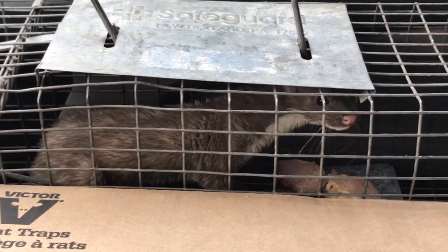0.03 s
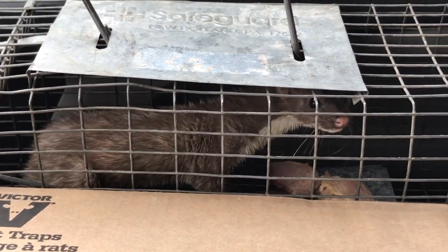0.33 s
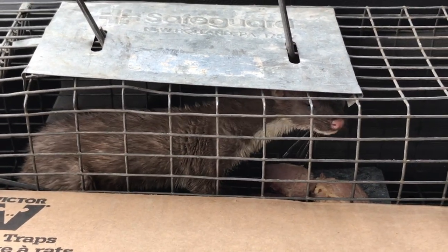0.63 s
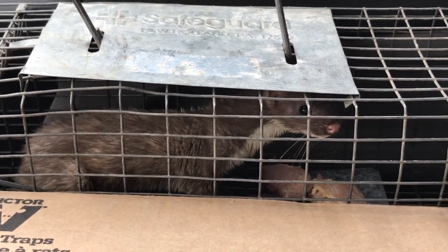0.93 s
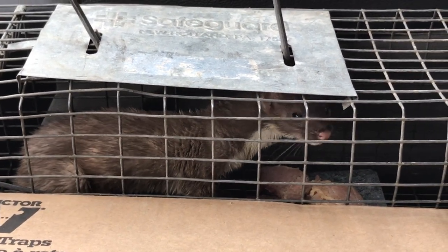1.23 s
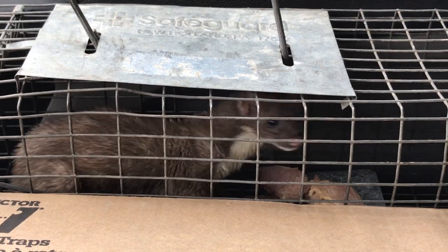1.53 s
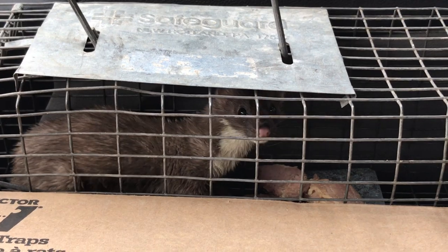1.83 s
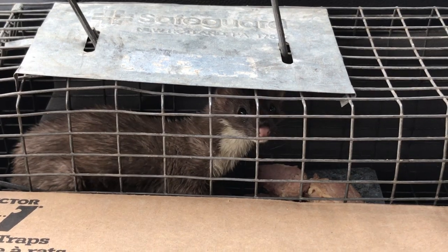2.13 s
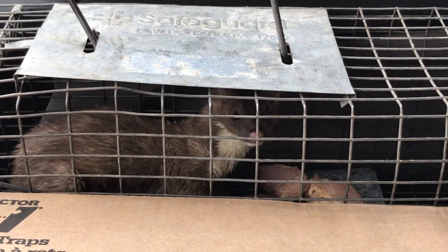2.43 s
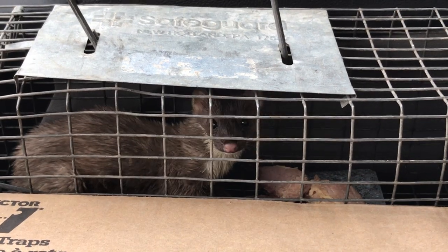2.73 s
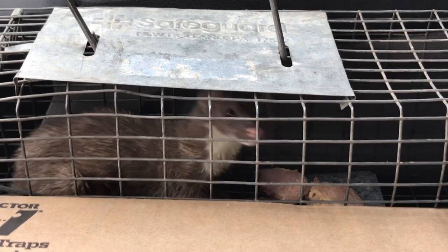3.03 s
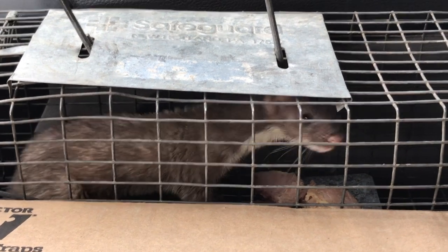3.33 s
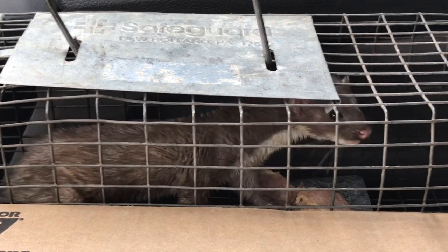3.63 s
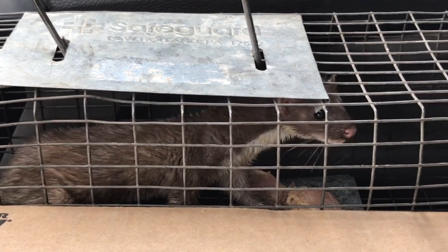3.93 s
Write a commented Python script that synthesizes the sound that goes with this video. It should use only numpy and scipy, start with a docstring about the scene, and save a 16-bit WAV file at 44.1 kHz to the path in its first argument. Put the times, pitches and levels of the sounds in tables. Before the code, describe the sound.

Two short, harsh hisses come from a trapped weasel nearby, after a faint nasal wheeze. Each swells and cuts off abruptly, the second with a soft paw bump, over steady outdoor rumble and the hum of far machinery.

```python
"""Outdoors, one microphone close to a weasel in a wire cage trap; a low rumble and the hum of far
machinery run throughout. First comes a faint, thin wheeze through the nose. At 1.3 s the animal hisses:
the breath starts thin through nearly shut jaws, broadens as they open and stops abruptly, while the
sheet-metal lid and the cage floor reflect it as the head moves. It shifts its feet at 3 s, then hisses
again with its head stretched forward, a paw bumping softly just after the start."""
import sys
import numpy as np
from scipy import signal
from scipy.fft import rfft, irfft
from scipy.io import wavfile
from scipy.ndimage import map_coordinates

SR = 44100
rng = np.random.default_rng(int(sys.argv[2]) if len(sys.argv) > 2 else 0)


def inscribe(sig):
    """Save sig as 16-bit PCM at rate SR to the path in sys.argv[1].

    A 1-D sig is mono; a 2-D sig holds one channel per row.
    Samples are clipped to [-1, 1] before scaling.
    """
    pcm = np.round(np.clip(np.atleast_2d(sig).T, -1, 1) * 32767)
    wavfile.write(sys.argv[1], SR, pcm.astype(np.int16))


N = 176400
TIME = np.arange(N) / SR


def from_db(db):
    """Decibels to gain."""
    return 10 ** (np.asarray(db) / 20)


def in_time(rows):
    """The columns of a curve at every sample."""
    times, *columns = np.transpose(rows)
    return [np.interp(TIME, times, column) for column in columns]


def gate(rows):
    """One between the first and last point of a curve, else zero."""
    return (TIME > rows[0][0]) & (TIME < rows[-1][0])


def white(size):
    """White noise of 0 dB per Hz."""
    return rng.standard_normal(size) * np.sqrt(SR / 2)


def coloured(spectrum):
    """Steady noise with a spectrum given as (frequency [Hz], level [dB per Hz])."""
    hz, db = np.transpose(spectrum)
    bin_hz = np.maximum(np.arange(N // 2 + 1) * SR / N, 1)
    bin_db = np.interp(np.log(bin_hz), np.log(hz), db)
    return irfft(rfft(white(N)) * from_db(bin_db), N)


def resonant_noise(hz, width_hz):
    """Turbulence passed twice through one resonance, whose centre may move; 0 dB per Hz at the peak."""
    pole = np.exp(-np.pi * width_hz / SR)
    run_in = SR // 4
    noises = [white(N + run_in), white(N + run_in)]
    swell = signal.lfilter([(1 - pole) ** 2], [1, -2 * pole, pole * pole], noises)[:, run_in:]
    phase = 2 * np.pi * np.cumsum(hz * np.ones(N)) / SR
    return np.sqrt(2) * (swell[0] * np.cos(phase) + swell[1] * np.sin(phase))


def drift(rate_hz):
    """A smooth random wander with a spread of one."""
    pole = np.exp(-2 * np.pi * rate_hz / SR)
    wander = signal.lfilter([1], [1, -2 * pole, pole * pole], rng.standard_normal(N + SR))[SR:]
    return wander / wander.std()


def background():
    """The open air around the trap: low rumble, faint air noise and the wavering hum of far machinery."""
    # spectra of the rumble and of the air above it: (frequency [Hz], level [dB per Hz])
    rumble = [(15, -99), (26, -86.5), (35, -75.5), (49, -63.5), (59, -71.5), (70, -66.5), (90, -69),
              (125, -76), (175, -83.5), (230, -85.5), (300, -91), (370, -96), (550, -99), (650, -101),
              (950, -103)]
    air = [(1150, -106), (1800, -112), (2200, -111), (2800, -115.5), (4450, -116), (4950, -121),
           (5800, -117.5), (7600, -122.5), (9500, -120), (10400, -125.5), (11100, -121), (12200, -120.5),
           (15700, -123.5)]
    # machinery hum lines: (frequency [Hz], width [Hz], level [dB per Hz])
    hum = [(68.95, 12, -70), (198.5, 8.6, -81.5), (319.2, 12.3, -84.5), (745, 71, -95), (1032, 8, -96.5)]
    return coloured(rumble + air) + sum(from_db(db) * resonant_noise(hz, width) for hz, width, db in hum)


def wheeze():
    """A thin stream of air excites the resonances of the weasel's nose."""
    # strength of the breath: (time [s], level [dB])
    breath = [(.22, -29), (.38, 0.5), (.52, 2), (.70, -2.5), (.78, -3), (.92, 2), (1.02, -6), (1.14, -25)]
    # nose resonances at 0 dB of breath: (frequency [Hz], width [Hz], level [dB per Hz])
    nose = [(3740, 330, -117.5), (4500, 400, -116.5), (5960, 450, -114.5), (6450, 870, -116.5),
            (8630, 2600, -126.5)]
    level_db, = in_time(breath)
    air = sum(from_db(db) * resonant_noise(hz, width) for hz, width, db in nose)
    return air * from_db(level_db) * gate(breath)


def hiss(gesture, mouth):
    """Breath excites the mouth; opening jaws shift and reweight its resonances and lift the teeth's rush.

    gesture: (time [s], effort [dB], jaw opening [0-1])
    mouth, at 0 dB effort: (frequency shut [Hz], frequency wide [Hz], width [Hz],
                            level shut [dB per Hz], level wide [dB per Hz])"""
    # air rushing past the teeth, jaws wide, at 0 dB effort: (frequency [Hz], level [dB per Hz])
    teeth = [(700, -124), (1200, -107), (3000, -106), (4900, -108), (5600, -104.5), (8000, -106),
             (10400, -109), (11200, -107), (13000, -108.5), (16000, -110)]
    teeth_shut_db, flutter_db = -7.5, 1.0
    effort_db, jaw = in_time(gesture)
    air = coloured(teeth) * from_db(teeth_shut_db * (1 - jaw))
    for shut_hz, wide_hz, width_hz, shut_db, wide_db in mouth:
        centre_hz = shut_hz + (wide_hz - shut_hz) * jaw
        peak_db = shut_db + (wide_db - shut_db) * jaw
        air += resonant_noise(centre_hz, width_hz) * from_db(peak_db)
    jet_db = effort_db + flutter_db * drift(rate_hz=58)   # the jet is unsteady
    return air * from_db(jet_db) * gate(gesture)


def first_hiss():
    """Head drawn back, the weasel pushes harder as its jaws open, loudest just before the stop."""
    # breath and jaws: (time [s], effort [dB], jaw opening [0-1])
    gesture = [(1.298, -38, 0), (1.322, -16.5, 0), (1.44, -8.5, 0.03), (1.48, -6.5, 0.47),
               (1.61, -5.5, 0.59), (1.70, -2, 0.53), (1.79, -1.5, 0.66), (1.83, 0.5, .88), (1.885, 1.5, 1),
               (1.905, -0.5, 0.99), (1.925, -34, 1)]
    # throat and mouth resonances: (shut [Hz], wide [Hz], width [Hz], shut [dB per Hz], wide [dB per Hz])
    mouth = [(1473, 1430, 510, -89.5, -89), (1740, 1790, 316, -83.5, -83), (2537, 2570, 170, -88.5, -86),
             (2880, 2870, 130, -82.5, -91), (3050, 3170, 200, -82.5, -94), (3596, 3540, 360, -99, -81),
             (4310, 4080, 650, -99, -92.5), (5390, 5180, 390, -101, -97), (5790, 6250, 690, -103, -97.5),
             (6600, 6800, 750, -106, -99), (8850, 8700, 680, -102, -90), (9400, 9410, 650, -94, -84.5),
             (10700, 11350, 440, -110, -104), (14500, 13800, 700, -113, -106),
             (14700, 15200, 700, -113, -100)]
    return hiss(gesture, mouth)


def delayed(sound, lag_ms):
    """The sound after a path of changing length."""
    return map_coordinates(sound, [(TIME - lag_ms / 1000) * SR], order=3)


def cage(direct):
    """The small lid and floor reflect the treble along moving paths; the surroundings scatter briefly."""
    # extra travel to the microphone as the head moves: (time [s], via lid [ms], via floor [ms])
    echo_lags = [(1.3, .69, 1.4), (1.5, .7, 1.44), (1.7, .75, 1.52), (1.92, .8, 1.59), (3.36, .77, 1.8),
                 (3.55, .72, 1.7), (3.68, .65, 1.42), (3.89, .62, 1.36)]
    lid_gain, floor_gain, reflects_above_hz = .3, .22, 4500
    scatter_db, scatter_t60_s = -13, .04
    lid_ms, floor_ms = in_time(echo_lags)
    treble = signal.sosfilt(signal.butter(1, reflects_above_hz, "high", fs=SR, output="sos"), direct)
    echoes = lid_gain * delayed(treble, lid_ms) + floor_gain * delayed(treble, floor_ms)
    t = TIME[:SR // 4]
    scatter = rng.standard_normal(len(t)) * np.exp(-np.log(1000) * t / scatter_t60_s)
    tail = signal.fftconvolve(direct, scatter / np.linalg.norm(scatter))[:N]
    return direct + echoes + from_db(scatter_db) * tail


def steps():
    """Paws shift on the cage floor: a soft scuff, then a brief bump."""
    # paw contacts: (time [s], length [s], frequency [Hz], width [Hz], peak level [dB per Hz])
    contacts = [(3.028, 0.082, 1474, 700, -105), (3.44, 0.013, 254, 290, -78), (3.441, .014, 560, 130, -85)]
    paws = np.zeros(N)
    for peak_s, length_s, hz, width_hz, db in contacts:
        envelope = np.exp(-2 * ((TIME - peak_s) / length_s) ** 2)
        paws += from_db(db) * resonant_noise(hz, width_hz) * envelope
    return paws


def second_hiss():
    """Head stretched forward, the breath surges as the jaws jerk half open, and holds until the stop."""
    # breath and jaws: (time [s], effort [dB], jaw opening [0-1])
    gesture = [(3.356, -39, 0.032), (3.374, -12, 0.019), (3.44, -7.5, 0.16), (3.496, -5, 0.26),
               (3.506, 2, .55), (3.53, -1, .5), (3.62, -1, 0.74), (3.69, -.5, 0.91), (3.78, -1, 1),
               (3.858, 1, 0.89), (3.87, -4.5, 0.96), (3.889, -29, 0.79)]
    # throat and mouth resonances: (shut [Hz], wide [Hz], width [Hz], shut [dB per Hz], wide [dB per Hz])
    mouth = [(1400, 1380, 460, -101, -91.5), (1640, 1690, 490, -95.5, -89.5), (2200, 2280, 660, -106, -94),
             (2780, 2970, 450, -95.5, -91), (3340, 3260, 250, -78, -87), (3536, 3680, 740, -100, -90),
             (4400, 4720, 630, -96.5, -92.5), (5370, 6250, 630, -105, -97.5), (7300, 7400, 690, -112, -105),
             (8800, 8530, 500, -107, -102), (9580, 9630, 670, -99.5, -95), (11200, 10000, 390, -104, -108),
             (11900, 12350, 400, -117, -104), (13800, 17000, 800, -108, -104),
             (14850, 14960, 490, -110, -94)]
    return hiss(gesture, mouth)


def scene():
    """The caged animal close by, over the distant background, in mono."""
    hisses = from_db(-0.07) * (first_hiss() + second_hiss())
    return (cage(hisses) + wheeze() + steps() + background())[None]


def record(dry):
    """The microphone's signal, with the highest treble cut steeply."""
    cutoff_hz = 15680
    return signal.sosfilt(signal.ellip(12, .1, 80, cutoff_hz, fs=SR, output="sos"), dry)


dry = scene()
out = record(dry)
inscribe(out)
```